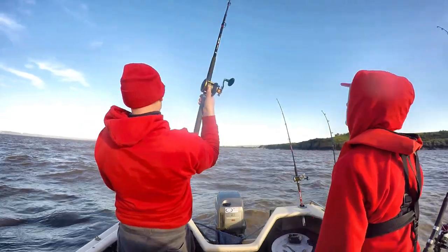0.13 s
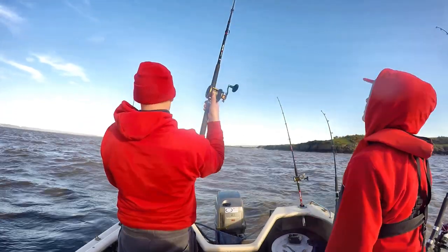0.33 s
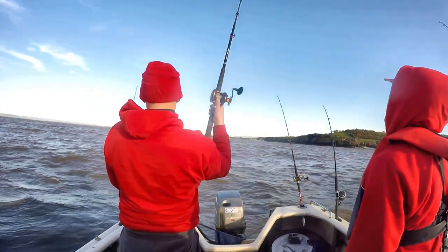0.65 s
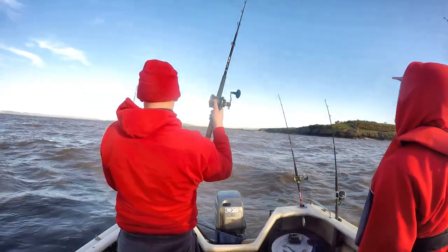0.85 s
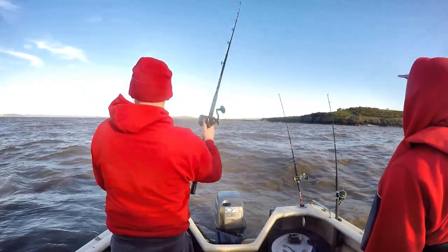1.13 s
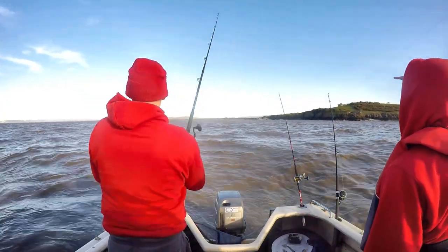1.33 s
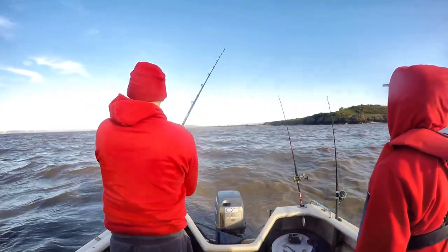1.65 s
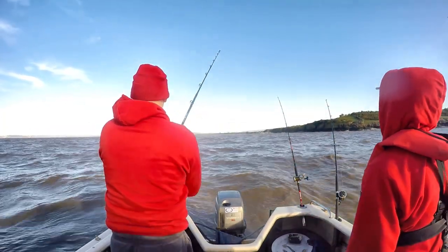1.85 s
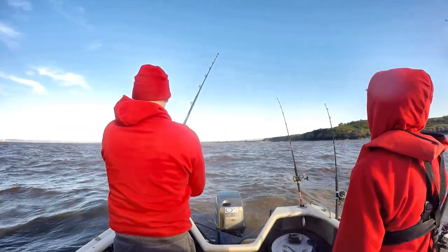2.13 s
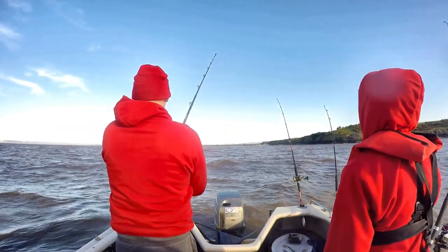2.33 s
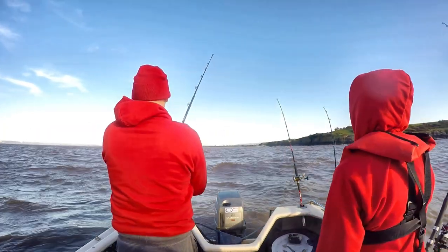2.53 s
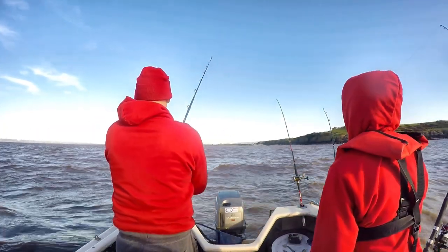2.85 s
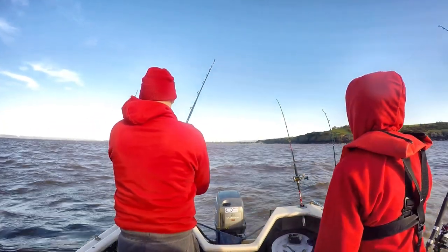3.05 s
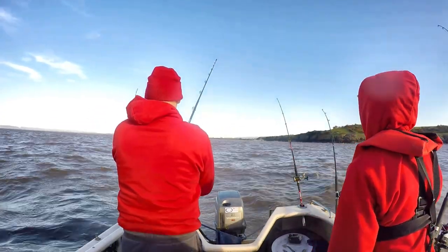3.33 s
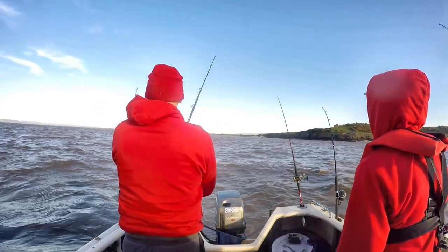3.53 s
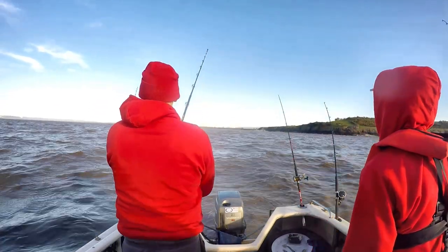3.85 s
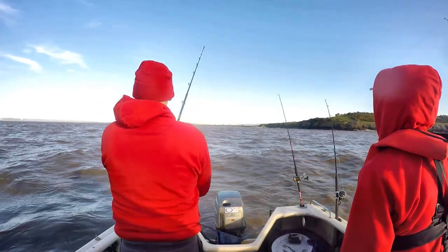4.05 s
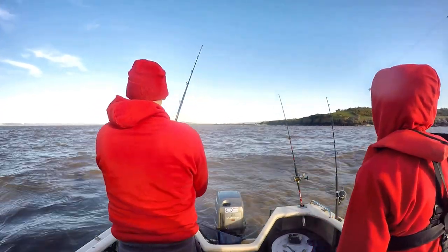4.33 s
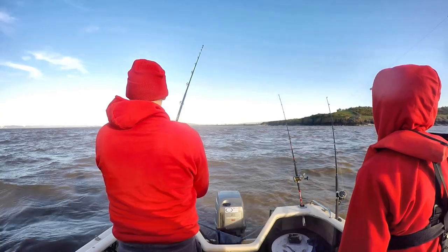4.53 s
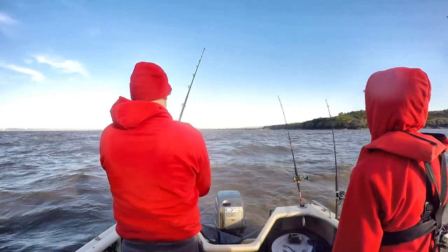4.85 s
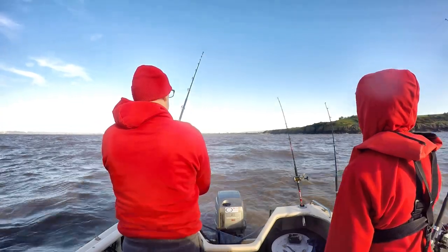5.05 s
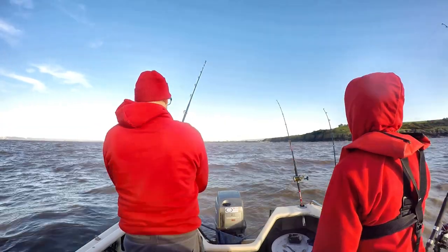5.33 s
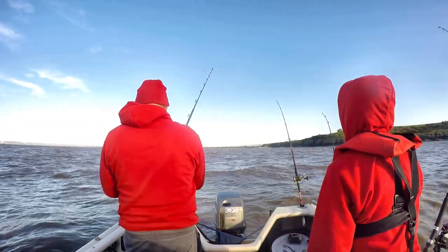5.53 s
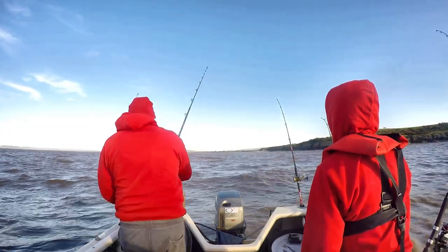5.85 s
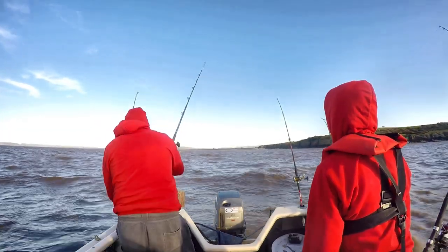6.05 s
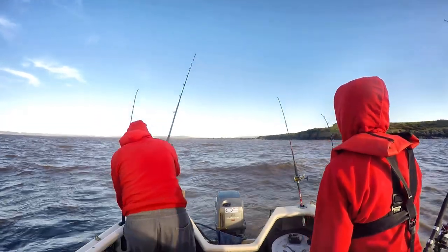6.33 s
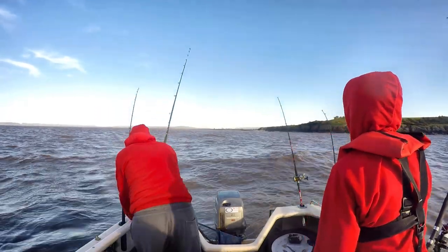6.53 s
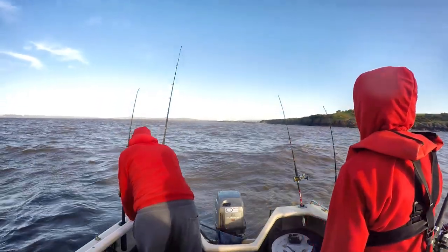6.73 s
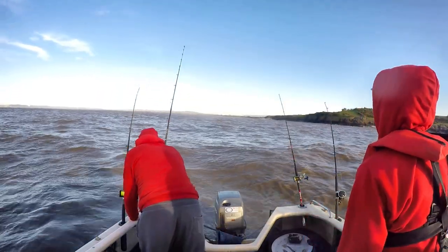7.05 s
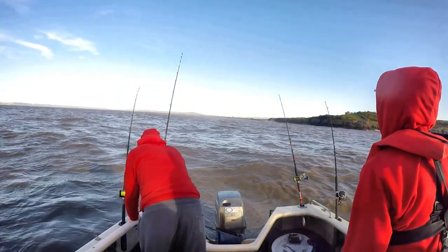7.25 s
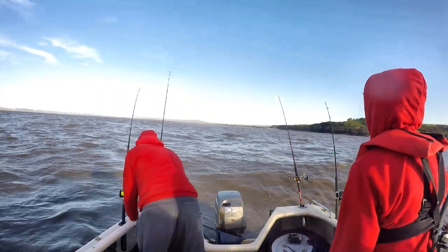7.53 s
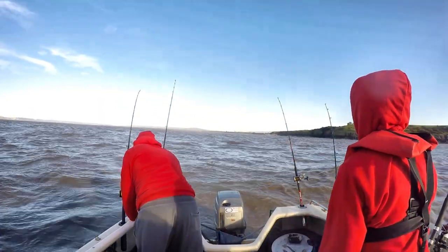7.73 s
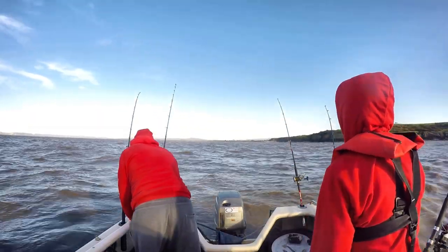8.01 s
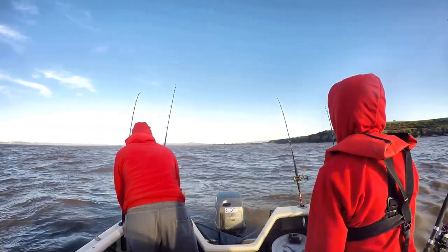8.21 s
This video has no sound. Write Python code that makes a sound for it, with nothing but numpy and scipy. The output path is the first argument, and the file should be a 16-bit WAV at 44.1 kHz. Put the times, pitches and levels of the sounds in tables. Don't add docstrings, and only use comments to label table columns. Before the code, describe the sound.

Small open boat hull hums and rumbles low on choppy water, with laps, drips, clamp creaks, a boomy step and a hard rod-butt knock.

```python
import sys
import numpy as np
from scipy import signal
from scipy.fft import rfft, irfft
from scipy.io import wavfile
from scipy.ndimage import uniform_filter1d

SR = 44100
rng = np.random.default_rng(int(sys.argv[2]) if len(sys.argv) > 2 else 0)


def bounce(signal):
    frames = np.transpose(np.atleast_2d(signal))
    limited = np.clip(frames, -1, 1)
    pcm = np.round(limited * 32767).astype(np.int16)
    wavfile.write(sys.argv[1], SR, pcm)


def invert_db(x):
    u = np.asarray(x, float) / 20
    return 10 ** u


N = 369558

# centre in Hz, width in Hz, level in dB.
WASH = [(1567, 460, 0.5), (1800, 340, 5), (2255, 820, -0.5)]
# start in s, hold in s, wash in dB, creaking in dB.
BOUTS = [(0.114, 0.015, -50, -69), (0.427, 0.007, -54, -78), (0.524, 0.047, -51.5, -56),
         (0.62, 0.35, -70, -83), (1.56, 0.25, -58, -68.5), (2.008, 0.018, -58, -60),
         (2.123, 0.021, -55, -69), (2.17, 0.19, -61.5, -78), (2.368, 0.077, -58, -53.5),
         (2.49, 0.071, -64.5, -56.5), (2.57, 0.066, -55, -53), (2.373, 0.022, -72, -53),
         (2.761, 0.039, -72, -56), (2.979, 0.095, -57, -64), (3.645, 0.12, -64, -71),
         (3.834, 0.065, -64, -65), (4.159, 0.14, -55, -53), (4.33, 0.25, -61.5, -52),
         (4.6, 0.1, -54.5, -58.5), (5.215, 0.024, -60, -63), (5.452, 0.012, -55.5, -57),
         (5.871, 0.2, -58, -69), (5.935, 0.091, -60, -55), (6.398, 0.047, -64, -62), (6.673, 0.6, -63, -59),
         (6.777, 0.022, -50, -43), (6.866, 0.0036, -53, -46), (6.976, 0.046, -57, -48),
         (7.084, 0.027, -54, -60), (7.497, 0.028, -62, -60.5), (7.654, 0.022, -48, -60.5),
         (8.261, 0.075, -53, -48)]
# calm level in dB, rise in dB per s, fall in dB per s.
TWIST = [(-68.5, 210, 140), (-69, 990, 390)]


def rms_one(x):
    return x / np.sqrt(np.mean(x ** 2) + 1e-20)


def in_time(rows):
    s, *columns = np.transpose(rows)
    return [np.interp(np.arange(N) / SR, s, column) for column in columns]


def drift(rate_hz):
    r = np.exp(-80 * np.pi * rate_hz / SR)
    noise = rng.standard_normal(N // 40 + 2002)
    slow = signal.lfilter([1], [1, -2 * r, r * r], noise)[2000:]
    return np.interp(np.arange(N) / 40, np.arange(len(slow)), rms_one(slow))


def pushed(events, rules):
    t = np.arange(0, N, 32) / SR
    s, hold_s, *levels_db = np.transpose(events)[:, :, None]
    early_s = np.maximum(s - t, 0)
    late_s = np.maximum(t - s - hold_s, 0)
    parts = []
    for db, (calm_db, rise, fall) in zip(levels_db, rules):
        pushes = invert_db(2 * (db - rise * early_s - fall * late_s)).sum(axis=0)
        power = invert_db(2 * calm_db) + pushes
        parts.append(np.interp(np.arange(N) / SR, t, 10 * np.log10(power)))
    return parts


def resonate(x, peaks, order):
    out = 0
    for k, (hz, width_hz, db) in enumerate(peaks):
        r = np.exp(-np.pi * width_hz / SR)
        b = (1 - r * r) / 2 * np.array([1, 0, -1])
        a = [1, -2 * r * np.cos(2 * np.pi * hz / SR), r * r]
        y = x
        for _ in range(order):
            y = signal.lfilter(b, a, y)
        out = out + invert_db(db) * (-1) ** k * y
    return out


def ring(clicks, hz, t60_s):
    r = invert_db(-60 / (t60_s * SR))
    w = 2 * np.pi * hz / SR
    return signal.lfilter([0, np.sin(w)], [1, -2 * r * np.cos(w), r * r], clicks + 1e-18)


def grains(per_s, spread_db):
    sizes = invert_db(spread_db * np.minimum(rng.exponential(1, N), 4)) * rng.choice([-1, 1], N)
    return sizes * (rng.random(N) < per_s / SR)


def hull(steady_s, steadiness):
    # centre in Hz, width in Hz, level in dB.
    mode_groups = [
        [(29.79, 5.4, 0.5), (21.37, 8.1, -10)],
        [(65.03, 6.3, 1), (81.6, 12.2, -11.5), (49.2, 27, -11.5)],
        [(114.1, 8.3, -0.5), (128.6, 7.8, 1)],
        [(164, 22, 7.5), (206.5, 19.7, -1.5)],
    ]
    # start in s, hold in s, rocking in dB.
    rolls = [(0.122, 0.14, -26), (0.397, 0.09, -23), (0.662, 0.028, -29.5), (0.847, 0.066, -28),
             (1.207, 0.075, -28), (1.494, 0.026, -24.5), (1.731, 0.023, -31), (2.014, 0.085, -32),
             (2.33, 0.2, -31.5), (2.811, 0.41, -27.5), (3.36, 0.047, -32), (4.05, 0.052, -32.0),
             (4.362, 0.3, -27.5), (5.47, 0.049, -33), (5.722, 0.12, -30), (5.997, 0.068, -27.5),
             (6.204, 0.15, -32), (6.525, 0.24, -29), (6.893, 0.056, -21.5), (7.176, 0.13, -27),
             (7.466, 0.016, -38), (7.578, 0.062, -32), (7.756, 0.094, -29), (8.01, 0.26, -32.5)]
    # start in s, hold in s, panel, floor boards, ribs in dB.
    jolts = [(0.098, 0.02, -32, -28, -41.5), (0.135, 0.0097, -22.5, -24, -34),
             (0.286, 0.055, -30, -33, -54), (0.473, 0.019, -40.0, -37, -35.5),
             (0.782, 0.015, -52.0, -58, -43.5), (1.126, 0.0076, -46, -31.5, -48),
             (1.697, 0.064, -39, -29.5, -37), (1.741, 0.15, -18.5, -75, -58),
             (2.005, 0.05, -90, -30.5, -51), (2.34, 0.042, -38, -80, -45), (2.573, 0.1, -80.0, -38, -58),
             (2.99, 0.023, -32.5, -43, -50), (3.598, 0.093, -37.5, -29.5, -53),
             (4.193, 0.19, -67.0, -40, -47.5), (4.88, 0.05, -55, -40, -56), (5.247, 0.06, -50, -41, -51),
             (5.49, 0.018, -35, -36, -50.5), (6.254, 0.057, -54, -38, -54), (8.047, 0.04, -48, -38.5, -52),
             (5.733, 0.053, -42, -43.5, -51.5), (6.432, 0.22, -39.5, -45.5, -67),
             (6.858, 0.0066, -32, -26.5, -82), (6.885, 0.039, -43, -33, -35),
             (7.117, 0.095, -39, -44.5, -59), (7.29, 0.013, -50, -38, -47), (7.413, 0.014, -53, -31.5, -46),
             (7.639, 0.06, -35, -19, -35), (7.72, 0.073, -28.5, -29, -40), (8.256, 0.04, -42.5, -36, -51)]
    # calm level in dB, rise in dB per s, fall in dB per s.
    rocking = [(-36.5, 219.5, 222)]
    # calm level in dB, rise, fall in dB per s.
    planking = [(-43, 1500, 74), (-46.5, 450, 128), (-56, 420, 120)]
    # time in s, floor boards in dB, ribs in dB.
    favour = [(.15, 9, -2.5), (0.501, -11.5, -5), (1.13, 4.5, 10), (1.75, 2, 3.5), (2.7, 0.5, -1.5),
              (3.7, 0, -10), (4.3, -9, 19), (4.9, 8.5, -7.5), (5.8, 1.5, 3.5), (6.899, 5, 10.5),
              (7.47, 18.5, 3.5), (7.582, -22, 1.5), (8.0, 0.5, 1.5)]
    chop_db, chop_hz = 2.2, 3.5
    levels_db = pushed(rolls, rocking) + pushed(jolts, planking)
    smooth = int(steady_s * SR)
    evening = np.clip(steadiness, 0, 1) / 2
    out = 0
    for peaks, level_db, favour_db in zip(mode_groups, levels_db, [0, 0, *in_time(favour)]):
        push = rng.standard_normal(N + SR)
        first = resonate(push, peaks[:1], order=2)[SR:]
        others = resonate(push, peaks[1:], order=2)[SR:]
        hum = first - invert_db(favour_db) * others
        hum = rms_one(hum / np.sqrt(1 + invert_db(2 * favour_db)))
        power = uniform_filter1d(uniform_filter1d(hum ** 2, smooth), smooth)
        even_hum = rms_one(hum / (power + 0.022) ** evening)
        out = out + invert_db(level_db + chop_db * drift(chop_hz)) * even_hum
    return out


def water():
    # centre in Hz, width in Hz, level in dB.
    lapping_peaks = [(250.5, 28, 2.5), (310, 28.7, 8), (351.6, 94, 2.5), (457, 547, -0.5), (698, 443, -1),
                     (897, 72, -3.5), (1115, 150, -10.5)]
    # centre in Hz, width in Hz, level in dB.
    cavity_peaks = [(1837, 120, 0)]
    # start in s, hold in s, level in dB.
    laps = [(0.128, 0.013, -43.5), (0.395, 0.086, -50), (1.127, 0.004, -59), (1.729, 0.018, -47.5),
            (1.843, 0.008, -58), (1.995, 0.02, -57.5), (2.329, 0.11, -53), (2.961, 0.05, -55),
            (3.635, 0.028, -60), (4.112, 0.21, -57.5), (4.471, 0.046, -55), (6.586, 0.077, -54.5),
            (6.75, 0.004, -56.5), (6.879, 0.004, -52), (7.22, 0.1, -57), (5.46, 0.034, -57),
            (8.15, 0.18, -58), (7.625, 0.056, -43.5)]
    # start in s, hold in s, level in dB.
    drains = [(0.1, 0.046, -55.5), (0.5, 0.047, -56), (0.63, 0.027, -56.5), (0.75, 0.12, -62.5),
              (1.6, 0.07, -64.5), (1.99, 0.19, -62.5), (2.4, 0.27, -61), (2.98, 0.079, -66),
              (3.66, 0.06, -64.5), (4.135, 0.06, -57), (4.24, 0.25, -61), (4.59, 0.13, -57),
              (5.88, 0.015, -61), (5.95, 0.11, -59.5), (6.12, 0.03, -73), (6.75, 0.16, -57),
              (6.95, 0.2, -62), (7.68, 0.033, -61), (8.25, 0.1, -57.5)]
    # calm level in dB, rise in dB per s, fall in dB per s.
    lapping_rule = [(-62, 220, 92)]
    # calm level in dB, rise in dB per s, fall in dB per s.
    draining_rule = [(-77, 880, 100)]
    lapping_db = pushed(laps, lapping_rule)[0] - 2.5 + 3.03 * drift(10.4)
    wash_db = pushed(BOUTS, TWIST)[0] - 2.5 + 2 * drift(25.0)
    drain_db = pushed(drains, draining_rule)[0]
    splash = rng.standard_normal(N) + 1.4 * rms_one(grains(300, 3.7))
    spray = rng.standard_normal(N) + 1.1 * rms_one(grains(500, 3.6))
    lapping = rms_one(resonate(splash, lapping_peaks, order=1))
    wash = rms_one(resonate(spray, WASH, order=2))
    trickle = rms_one(resonate(spray[::-1], cavity_peaks, order=1))
    return invert_db(lapping_db) * lapping + invert_db(wash_db) * wash + invert_db(drain_db) * trickle


def clamp():
    # centre in Hz, width in Hz, level in dB.
    clamp_peaks = [(2586, 370, 2), (3038, 280, 5), (3554, 430, 3.5), (3890, 450, -4.5), (4400, 750, -20),
                   (5460, 740, -21.5)]
    # start in s, peak in dB, low squeak in dB.
    squeaky_slips = [(0.528, -47, -8), (0.567, -44, -4), (1.146, -44, 0), (1.558, -40, -17), (1.57, -46, -6),
                     (1.582, -49, -4), (0.1027, -53, 4), (0.1227, -48, 2), (0.146, -48, 16),
                     (0.581, -43, -9), (8.26, -39, -5), (8.292, -41, -7), (7.104, -41, -10),
                     (6.962, -43, -8), (2.027, -37.5, -14), (2.366, -49, -16), (2.394, -37, -11),
                     (2.484, -39, -6), (2.5047, -31, -16), (2.579, -42, -15), (2.9693, -41, 2),
                     (3.025, -38, -2.5), (3.034, -40, 1), (2.377, -42, -8), (2.408, -46, -10),
                     (2.53, -44, -10), (2.99, -52, 9), (3.068, -40, -8), (3.1135, -33, -3), (4.1749, -47, 1),
                     (4.238, -42, -10), (4.277, -44, -1), (4.344, -42, -8), (4.547, -43, -14),
                     (4.587, -37.5, -10), (4.6495, -44, -3), (5.849, -39, -11), (5.963, -42, -8),
                     (6.772, -42, -4), (6.787, -40, -4), (6.8653, -55, -4), (6.974, -48, -15),
                     (6.996, -36, -3), (7.688, -39, -12), (8.2206, -41, -5.5)]
    # start in s, peak in dB.
    more_slips = [(0.183, -45.5), (0.218, -44), (0.485, -47), (2.35, -39.5), (2.71, -47), (2.796, -45),
                  (3.225, -49), (3.75, -50), (3.776, -46), (3.836, -46), (4.312, -43), (4.378, -45),
                  (4.431, -43), (4.5144, -43), (5.1253, -52), (5.21, -58), (5.4545, -57), (5.6745, -57),
                  (5.81, -49), (5.888, -42), (5.933, -41), (5.945, -46), (6.146, -48), (6.31, -45), (6.441, -60),
                  (7.093, -44), (7.175, -58), (7.488, -48), (7.554, -51), (7.7, -48), (5.982, -44), (5.998, -44),
                  (6.025, -50), (6.04, -58), (6.24, -57), (6.32, -48), (6.385, -55), (5.836, -50), (0.605, -52),
                  (0.926, -59), (1.536, -52), (1.625, -48), (1.707, -57), (1.928, -52), (2.018, -52),
                  (2.15, -54), (2.779, -53), (3.09, -48), (3.21, -53), (3.254, -49), (3.315, -54), (3.675, -56),
                  (3.878, -50), (4.153, -47), (4.476, -62), (6.695, -49), (6.839, -48), (7.07, -42),
                  (7.213, -48), (7.271, -60), (7.372, -48), (4.398, -45), (7.145, -51), (6.917, -49),
                  (0.325, -52)]
    slip_s, onset_rate, common_squeak_db = .0085, 2.2, -9
    flutter = invert_db(pushed(BOUTS, TWIST)[1] - 5.0 + 3 * drift(53))
    t = np.arange(int(4 * slip_s * SR)) / SR / slip_s
    slip_shape = (1 - np.exp(-t * onset_rate)) * np.exp(-t ** 2)
    slips, squeaks = np.zeros(N), np.zeros(N)
    for s, db, squeak_db in squeaky_slips + [(*tick, common_squeak_db) for tick in more_slips]:
        burst = invert_db(db - 5.5) * slip_shape
        at = round(s * SR)
        slips[at:at + len(t)] += burst[:N - at]
        squeaks[at:at + len(t)] += invert_db(squeak_db) * burst[:N - at]
    friction = rng.standard_normal(N) + 1.34 * rms_one(grains(1500, 2.4))
    friction = friction / np.std(resonate(friction, clamp_peaks, order=2))
    creak = resonate(friction * (flutter + slips), clamp_peaks, order=2)
    squeak = resonate(friction * squeaks, WASH, order=2)
    return creak + invert_db(2.5) * squeak


def plops():
    # start in s, peak in dB,
    # pitch in Hz, t60 in s.
    drops = [(0.029, -41, 926, 0.042), (0.147, -41, 740, 0.028), (0.355, -48, 1390, 0.064),
             (0.426, -32, 1670, 0.014), (0.521, -39, 897, 0.053), (1.574, -43.5, 926, 0.11),
             (1.611, -45, 2230, 0.06), (1.998, -45, 1800, 0.04), (3.64, -43, 896, 0.055),
             (5.671, -47, 2300, 0.04), (6.246, -48.5, 1140, 0.055), (7.6, -38, 990, 0.035),
             (2.32, -46, 610, 0.08), (3.391, -46, 1000, 0.06), (6.243, -49, 2660, 0.04),
             (3.466, -47, 1900, 0.03), (7.655, -20, 1020, 0.038), (7.652, -21, 1390, 0.026),
             (0.1455, -30, 1686, 0.025), (0.146, -36, 2300, 0.02), (0.44, -45, 1100, 0.04),
             (1.165, -48, 1080, 0.049), (1.738, -40, 1690, 0.04), (8.034, -46, 1810, 0.028)]
    # start in s, peak in dB, pitch in Hz, t60 in s.
    gulps = [(0.425, -39, 336, 0.18), (0.725, -44, 327, 0.19), (1.118, -48, 310, 0.22),
             (1.37, -43.5, 303, 0.19), (1.839, -53, 253, 0.12), (4.985, -38.5, 310, 0.2),
             (5.698, -44, 310, 0.18)]
    out, t = np.zeros(N), np.arange(SR // 4) / SR
    for s, db, hz, t60_s in drops + gulps:
        tone = np.sin(2 * np.pi * hz * t * (1 + .5 * t))
        note = tone * invert_db(db - 60 * t / t60_s) * (1 - np.exp(-t * hz / 4))
        at = round(s * SR)
        out[at:at + len(t)] += note[:N - at]
    return out


def slaps():
    # start in s, peak in dB, t60 in s.
    wave_hits = [(0.097, -36, 0.06), (0.107, -35, 0.057), (0.124, -32.5, 0.049), (0.136, -37.5, 0.05),
                 (0.147, -30.5, 0.044), (0.158, -42, 0.053), (0.439, -44, 0.085), (1.151, -44, 0.044),
                 (1.701, -39.5, 0.054), (1.733, -37.5, 0.076), (1.759, -41, 0.044), (1.849, -45.5, 0.055),
                 (3.637, -41, 0.079)]
    shape, t = np.zeros(N), np.arange(SR // 8) / SR
    for s, db, t60_s in wave_hits:
        at = round(s * SR)
        shape[at:at + len(t)] += invert_db(db - 6.5 - 60 * t / t60_s) * (1 - np.exp(-t / 0.0031))
    band = signal.butter(3, [350, 2100], "band", fs=SR, output="sos")
    return shape * rms_one(signal.sosfilt(band, rng.standard_normal(N)))


def thuds():
    # start in s, peak in dB.
    contacts = [(0.102, -41), (0.135, -33), (1.125, -59), (1.671, -46.5), (1.722, -56), (1.841, -52),
                (2.336, -50.5), (3.656, -51), (4.219, -62), (6.876, -41.5), (7.627, -30)]
    # pitch in Hz, level in dB, t60 in s.
    struck_modes = [(59, -11, 0.64), (111.7, 11.5, 0.69), (184.6, 7, 0.32), (192, 5.5, 0.16),
                    (280, -19, 0.079), (310, 0, 0.22), (387, -21, 0.11), (468, -21, 0.02),
                    (614, -4.5, 0.081)]
    push, t = np.zeros(N), np.arange(SR // 16) / SR
    soften = signal.butter(1, 500, fs=SR, output="sos")
    for s, db in contacts:
        noise = rng.standard_normal(len(t))
        soft = signal.sosfilt(soften, (noise + 0.5) * np.exp(-t / 0.014))
        at = round(s * SR)
        push[at:at + len(t)] += invert_db(db - 30.5) * soft
    return sum(invert_db(db) * ring(push, hz, t60_s) for hz, db, t60_s in struck_modes)


def booms():
    # start in s, peak in dB, pitch in Hz, t60 in s.
    steps = [
        (0.132, -7, 59.4, 0.33),
        (7.655, -14, 62.67, 0.75),
        (7.656, -20, 114, 0.5),
        (7.65, -24, 200, 0.13),
        (6.872, -30, 205, 0.25),
    ]
    rise_s = .012
    t = np.arange(N) / SR
    out = np.zeros(N)
    for s, db, hz, t60_s in steps:
        after = np.maximum(t - s, 0)
        envelope = invert_db(db - 60 * after / t60_s) * (1 - np.exp(-after / rise_s))
        out += envelope * np.sin(2 * np.pi * hz * after)
    return out


def rod():
    # start in s, peak in dB.
    hits = [
        (7.6335, -28),
        (7.6479, -9.5),
    ]
    # pitch in Hz, level in dB, t60 in s.
    holder_modes = [(941, -10.5, 0.053), (1140, -11, 0.049), (1467, -1, 0.023), (1597, -15, 0.076),
                    (1813, 2, 0.026), (2200, 11, 0.013), (2665, 12.5, 0.013), (3130, 6, 0.0092),
                    (3590, -18.5, 0.031), (4320, -6, 0.009), (5180, 7, 0.0065), (5470, -20, 0.012),
                    (6650, -34, 0.014), (7580, -25, 0.014)]
    swell_in_s, tail_db = .0028, -32
    out, t = np.zeros(N), np.arange(SR // 5) / SR
    modes = 0
    for hz, db, t60_s in holder_modes:
        phase = rng.uniform(0, 2 * np.pi)
        modes = modes + invert_db(db - 60 * t / t60_s) * np.sin(2 * np.pi * hz * t + phase)
    band = signal.butter(4, [600, 3300], "band", fs=SR, output="sos")
    rattle = signal.sosfilt(band, rng.standard_normal(len(t)))
    rattle_decay = invert_db(3.5 - 60 * t / 0.033) + invert_db(tail_db - 60 * t / 0.091)
    blow = (modes + rattle_decay * rattle) * (1 - np.exp(-t / swell_in_s)) ** 2
    for s, db in hits:
        at = round(s * SR)
        out[at:at + len(t)] += invert_db(db) * blow
    return out


def wind():
    # frequency in Hz, density in dB per Hz.
    floor = np.array([(120, -25.5), (200, -2), (253, -31), (315, -13.5), (429, -16), (904, -17),
                      (1280, -24), (1840, -18), (2050, -20.5), (3060, -22.5), (3290, -30.5), (3730, -27.5),
                      (4320, -28.5), (12400, -38.5), (15400, -35)])
    hiss_db, rumble_db = -60.5, -56
    hz = np.maximum(np.fft.rfftfreq(N, 1 / SR), 1)
    shape_db = np.interp(np.log(hz), np.log(floor[:, 0]), floor[:, 1])
    hiss = rms_one(irfft(rfft(rng.standard_normal(N)) * invert_db(shape_db), N))
    band = signal.butter(3, [25, 200], "band", fs=SR, output="sos")
    rumble = rms_one(signal.sosfilt(band, rng.standard_normal(N)))
    return invert_db(hiss_db + .35 * drift(1.9)) * hiss + invert_db(rumble_db + 3 * drift(4.3)) * rumble


def scene():
    boat = hull(steady_s=0.17, steadiness=0.98) + water() + clamp() + plops() + slaps()
    boat = boat + thuds() + booms() + rod() + wind()
    close = np.minimum(np.arange(N, 0, -1) / 300, 1)
    return (boat * close)[None]


def top_cut(x):
    return signal.sosfilt(signal.butter(12, 15570, fs=SR, output="sos"), x)


def record(dry):
    mix = 0.99 * np.tanh(dry / 0.9)
    return top_cut(mix)


dry = scene()
out = record(dry)
bounce(out)
```